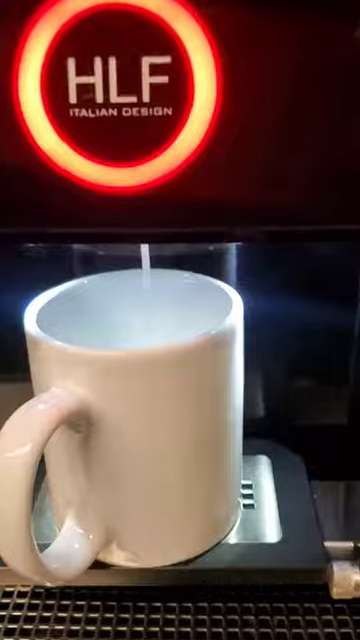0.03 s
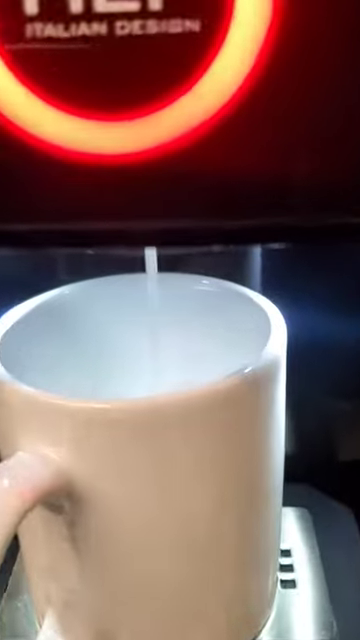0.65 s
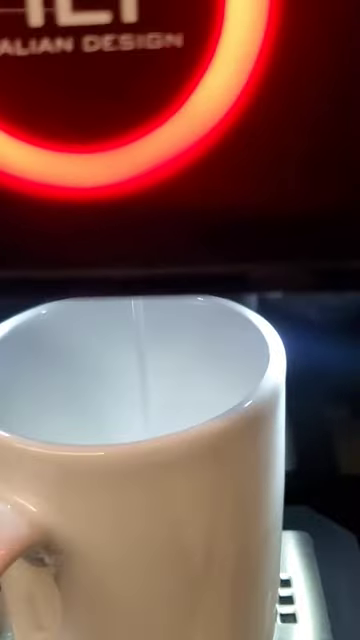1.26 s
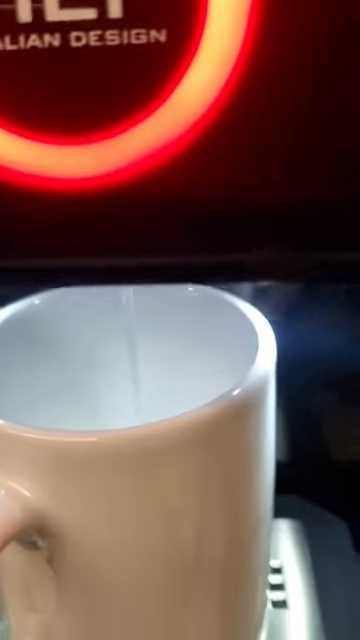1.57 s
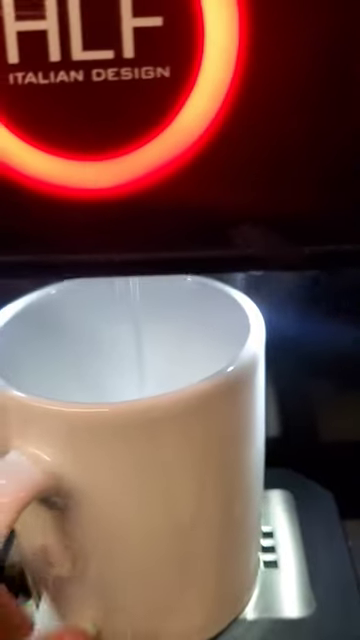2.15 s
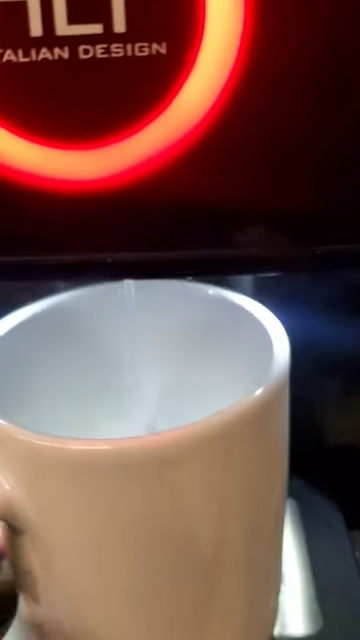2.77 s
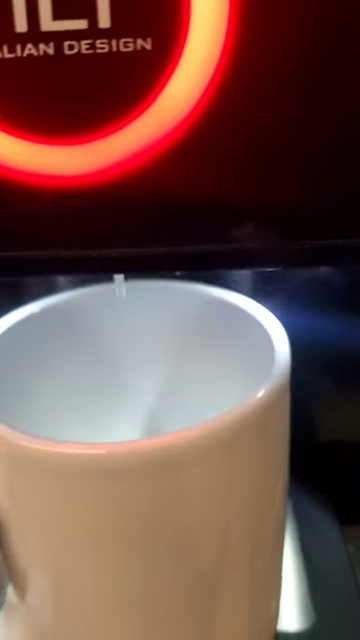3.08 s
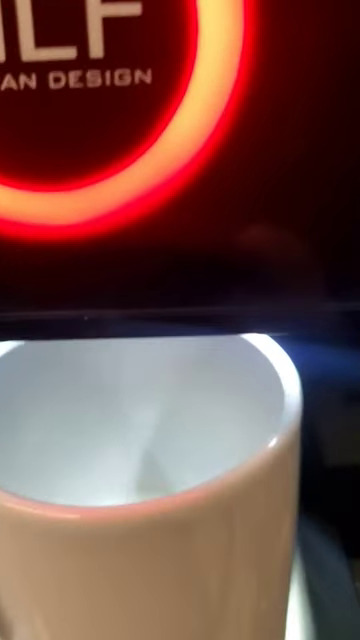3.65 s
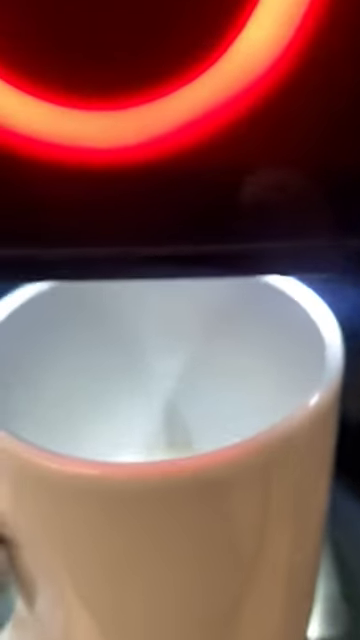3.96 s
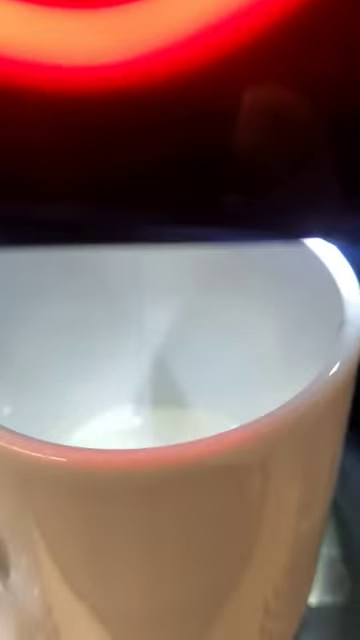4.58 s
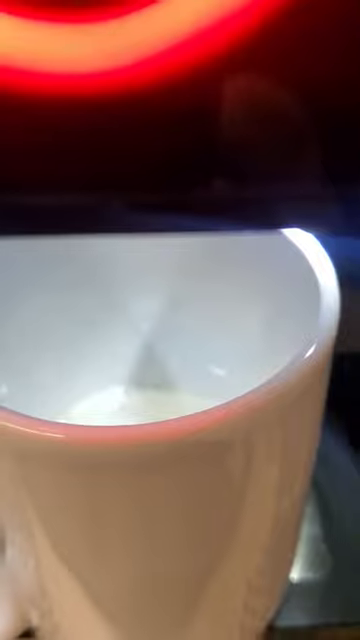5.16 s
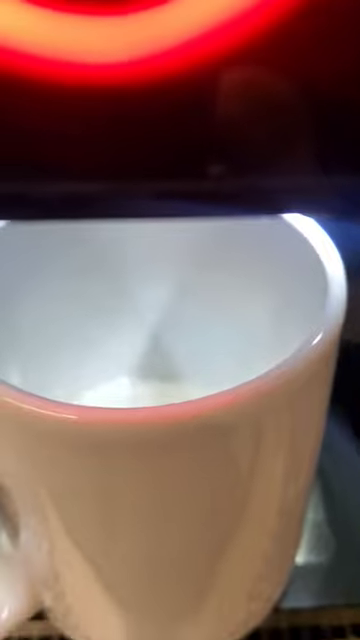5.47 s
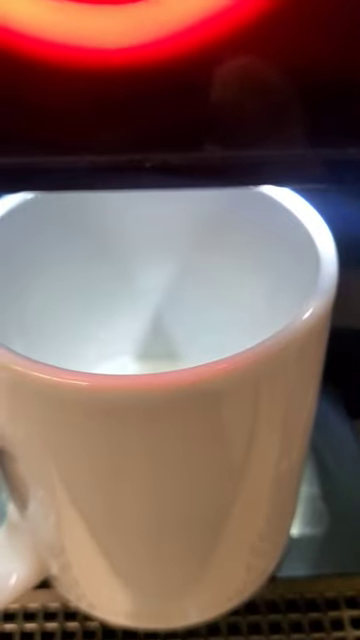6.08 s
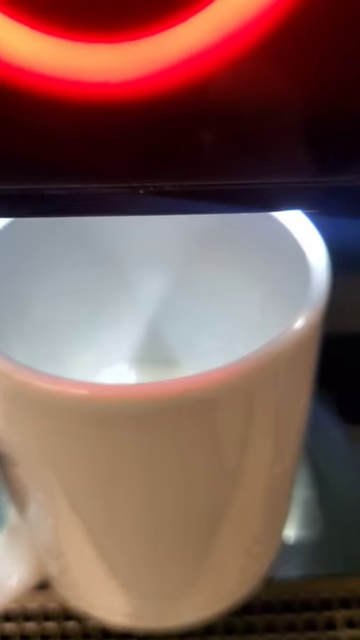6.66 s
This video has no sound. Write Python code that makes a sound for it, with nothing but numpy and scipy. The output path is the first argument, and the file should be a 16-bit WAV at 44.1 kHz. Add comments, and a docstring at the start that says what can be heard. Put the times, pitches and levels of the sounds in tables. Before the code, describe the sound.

A coffee machine fills a china mug, heard close in a quiet room with a steady fan underneath. From the start the pump gives a low hum with a slight whine, while a thin stream trickles into the mug. Irregular drops plip and splat, ringing briefly in the hollow of the mug, and foam makes small sharp ticks. A soft steam hiss swells at about 2 seconds and again near 3.6. At 4.2 seconds a valve gives one dry click and the pump stops. The last drops keep falling, softer, until about 5 seconds. At 5.1 seconds air drives the remaining water out of the spout in a noisy, gurgling spurt, with sharp spits and hollow plastic knocks, dying away by about 6 seconds. Until the end, near 7 seconds, the fan runs on with a faint hiss and a few ticks.

```python
"""A coffee machine pours a thin stream into a china mug, close by, in a quiet room with a fan running.
From the start the pump hums, drops trap bubbles that plip and ring the air in the mug, and foam ticks.
Steam swells twice in the spout; then a valve clicks and, at 4.2 s, the pump stops.
The last drops fall, and from 5.1 s air drives the water out of the spout, which spits and knocks.
At the end the fan runs on under a faint hiss and a few ticks."""
import sys
import numpy as np
from scipy import signal
from scipy.fft import rfft, irfft
from scipy.io import wavfile

SR = 44100
rng = np.random.default_rng(int(sys.argv[2]) if len(sys.argv) > 2 else 0)


def store_pcm(level_fs):
    """Save levels as 16-bit WAV."""
    pcm = np.round(np.clip(level_fs, -1, 1) * 32767).astype(np.int16)
    wavfile.write(sys.argv[1], SR, np.atleast_2d(pcm).T)


N = 300762
TIME, FREQ = np.arange(N) / SR, np.fft.rfftfreq(N, 1 / SR)
MAINS_HZ, SHAFT_HZ = 60, 28.82
START_S, PUMP_STOP_S = 0.086, 4.2
COVERED_S = 2.12  # from here on the rising liquid changes how the mug rings

# Strength of the stream. Each row: time in seconds, gain in dB.
STREAM_GAIN = [(0.1, -3.5), (1.0, 0), (1.7, 1.5), (2.2, -2.5), (2.8, -4), (3.4, -1.5), (4.15, -4),
               (4.35, -14), (4.55, -4.5), (5.1, -3)]
# Modes of the air in the mug. Each row: frequency in Hz, relative level in dB, T60 in seconds,
# change as the liquid rises in dB per second.
MUG_MODES = [(998, -0.5, 0.032, 2), (1332, 3.5, 0.039, -0.3), (1887, 0, 0.024, 2), (2630, -5.5, 0.026, 0),
             (2961, 3, 0.044, -3), (3320, -6, 0.025, -2.5), (4054, -1.5, .02, -2.5),
             (4764, -10.5, 0.038, -0.8), (5340, -12.5, 0.017, 2), (6100, -15.5, 0.029, 2.5)]
# Small bubbles, singing near those modes. Each row: pitch in Hz, bubbles per second, relative level in dB,
# change as the liquid rises in dB per second, left-right difference in dB.
BUBBLE_BANDS = [(950, 24, -36, -0.1, 2), (1280, 6.9, -41.5, 2.5, -4), (1864, 6, -46.5, 2, 9.5),
                (2962, 17, -40, -4.5, -0.5), (4200, 3, -54, -7, -9), (5850, 2, -51, -2, -10)]
# Spectrum of foam ticks and patter. Each row: frequency in Hz, gain in dB.
TICK_SPECTRUM = [(1500, -12), (3000, 0), (6000, 8), (8500, -1), (11000, 8), (16000, 0.5)]
STREAM_END_S, LOWEST_MODE_HZ = STREAM_GAIN[-1][0], MUG_MODES[0][0]


def amp(db):
    """Amplitude grows tenfold for every 20 dB."""
    return 10 ** (np.asarray(db) / 20)


def unit(x):
    """Normalisation to an rms of one."""
    return x / np.sqrt(np.mean(x ** 2) + 1e-20)


def read(points, hz):
    """Linear interpolation on a log-frequency axis."""
    f, value = np.transpose(points)
    return np.interp(np.log(hz + 1), np.log(f + 1), value)


def pan(db):
    """Interaural level difference, as left and right gains."""
    return amp(np.array([np.atleast_1d(db), -np.atleast_1d(db)]) / 2)


def add(mix, s, sound):
    """Superposition: a stereo sound joins the mix at s seconds."""
    part = mix[:, max(round(s * SR), 0):][:, :sound.shape[1]]
    part += sound[:, :part.shape[1]]


def wander(hz):
    """Low-pass noise: a random fluctuation of rms one."""
    return unit(irfft(rfft(rng.standard_normal(N)) * np.exp(-(FREQ / hz) ** 2), N))


def shape(x, spectrum):
    """Filtering: each frequency is multiplied by its gain."""
    return irfft(rfft(x) * amp(read(spectrum, FREQ)), N)


def colour(x, spectrum):
    """Spectral shaping to an rms of one."""
    return unit(shape(x, spectrum))


def envelope(start_s, hold_s, release_s, rise_s=0.0057):
    """Linear attack, hold and exponential decay."""
    t = TIME - start_s
    return np.clip(t / rise_s, 0, 1) * np.exp(-np.maximum(t - rise_s - hold_s, 0) / release_s)


def burst(t, rise_s, decay_s):
    """A transient builds up and decays exponentially."""
    return np.exp(-t / decay_s) * (1 - np.exp(-t / rise_s))


def tone(hz, waver_rad, left_lead_rad=0):
    """Random phase modulation makes a stereo sine of rms one waver."""
    phase = 2 * np.pi * np.cumsum(hz * np.ones(N)) / SR + waver_rad * wander(7.3)
    return np.sqrt(2) * np.sin(phase + rng.uniform(0, 2 * np.pi) + np.array([[left_lead_rad], [0]]))


def ring(modes, samples, uneven_db, rise_s):
    """Modal response to a blow: damped sines of uneven strength, with a different phase at each ear."""
    t = np.arange(samples) / SR
    hz, db, t60 = np.transpose(modes)[:, :, None]
    strength = amp(db + uneven_db * rng.standard_normal(hz.shape))
    phase = rng.uniform(0, 2 * np.pi, hz.shape) + rng.standard_normal((2, *hz.shape))
    waves = strength * np.exp(-np.log(1000) * t / t60) * np.sin(2 * np.pi * hz * t + phase)
    return waves.sum(axis=1) * (1 - np.exp(-t / rise_s))


def air():
    """Flow noise reaches the two ears with a correlation and balance that depend on frequency."""
    # Each row: frequency in Hz, interaural correlation before clipping.
    likeness = [(60, 0.2), (130, 1.14), (290, 0.63), (640, -0.54), (1410, -0.5), (3100, -0.32),
                (6820, -0.06), (15000, -1.8)]
    # Each row: frequency in Hz, left-right difference in dB.
    balance = [(60, 1), (110, 0.5), (200, 2), (380, -0.5), (700, 5), (1290, 1), (2380, 2), (4400, -7),
               (8120, -1.5), (15000, 22)]
    left, independent = rfft(rng.standard_normal((2, N)))
    correlation = np.clip(read(likeness, FREQ), -.99, .99)
    right = correlation * left + np.sqrt(1 - correlation ** 2) * independent
    return irfft(np.array([left, right]) * pan(read(balance, FREQ)), N)


def droplets(per_s, spread_db):
    """Shot noise: random impacts of uneven size, each with its own strength at each ear."""
    size = amp(spread_db * np.minimum(rng.exponential(1, N), 3)) * (rng.random(N) < per_s / SR)
    return unit(size * rng.standard_normal((2, N)))


def froth(per_s, spread_db, ring_s=0.002):
    """Tiny bubbles of many sizes resonate, each as a short ping."""
    out, t = np.zeros((2, N)), np.arange(SR // 100) / SR
    swell = t * np.exp(-t / ring_s)
    for when, pitch, size, side in rng.random((int(per_s * N / SR), 4)):
        ping = swell * np.sin(2 * np.pi * (1500 + 14000 * pitch ** 2) * t)
        gain = amp(spread_db * min(-np.log(1 - size), 3))
        add(out, when * N / SR, gain * np.outer([side, 1 - side], ping))
    return unit(out)


def echoes(x, t60s, delay_s):
    """Reverberation: dense random reflections, each band falling 60 dB in its own T60."""
    hz, t, bands = signal.stft(rng.standard_normal((2, SR // 2)), SR, nperseg=128)
    tail = signal.istft(bands * amp(-60 * t / read(t60s, hz)[:, None]), SR, nperseg=128)[1]
    tail = np.pad(tail, ((0, 0), (round(delay_s * SR), 0)))
    return signal.fftconvolve(x, tail / np.linalg.norm(tail[0]), axes=1)[:, :N]


def fan(air_db=-37.5, tones_gain_db=-1):
    """The cabinet's duct filters the cooling fan's steady flow noise; a few tones waver beside it."""
    # Each row: tone frequency in Hz, relative level in dB.
    tones = [(59.2, -51), (145.3, -48), (177.6, -51.5), (226.1, -49)]
    # Each row: frequency in Hz, relative level of the flow noise in dB.
    air_spectrum = [(12, -37), (20, -8.5), (65, -0.5), (116, -2), (134, -14), (182, -4), (357, -5.5),
                    (642, -12.5), (759, -9), (949, -6.5), (1060, -14.5), (1530, -19), (2020, -27.5),
                    (2910, -30), (16000, -63)]
    # Peaks and a dip of the duct. Each row: centre in Hz, width in Hz, gain in dB.
    duct = [(424, 200, -2.5), (629, 54, 8.5), (900, 560, 1.5)]
    duct_db = sum(db * np.exp(-((FREQ - hz) / width) ** 2) for hz, width, db in duct)
    rush = colour(irfft(rfft(air()) * amp(duct_db), N), air_spectrum)
    drone = sum(amp(db) * tone(hz, waver_rad=0.64) for hz, db in tones)
    return amp(air_db) * rush + amp(tones_gain_db) * drone


def pump(drive_db=-32.5, soft_start_db=-4, settle_s=0.35, coast_s=0.054, slowing_per_s=0.13, rush_db=-39):
    """Forced vibration: the motor hums at twice the mains, its shaft whines, water rushes; all die away."""
    # Mains harmonics. Each row: multiple, level in dB re the drive, left-right difference in dB.
    mains_lines = [(1, -42, 12), (8, -25, -10), (10, -32, -11), (12, -20, -7)]
    # Shaft tones. Each row: multiple of the shaft rate, level in dB re the drive, left-right in dB.
    shaft_lines = [(2.934, -21.5, -8), (8.01, -13.5, -1), (11.87, -23.5, -18), (12.91, -26.5, 25),
                   (13.81, -30.5, -25), (17.85, -22, -16), (24.2, -43, -36), (27.33, -30.5, 15),
                   (26.84, -29.5, -27)]
    # Rushing water. Each row: frequency in Hz, relative level in dB.
    rush_spectrum = [(30, 2), (80, -6), (170, -2.5), (280, 1), (370, -10), (450, -8), (620, -1), (850, 1),
                     (1200, -6.5), (1600, -21), (3000, -22.5), (8000, -48.5)]
    # The hum drifts to the left. Each row: time in seconds, left-right difference in dB.
    hum_side = [(0.1, 2), (1.2, 7.5), (4.2, 8)]
    stopped_s = np.maximum(TIME - PUMP_STOP_S, 0)
    speed = np.exp(-slowing_per_s * stopped_s)
    drive = amp(drive_db + soft_start_db * np.exp(-TIME / settle_s)) * np.exp(-stopped_s / coast_s)
    hum = amp(1.5) * tone(2 * MAINS_HZ * speed, waver_rad=0.074, left_lead_rad=1.03)
    hum *= pan(np.interp(TIME, *np.transpose(hum_side)))
    whine = sum(amp(db) * pan(side_db) * tone(multiple * hz * speed, waver_rad=0.2, left_lead_rad=-0.5)
                for hz, lines in ((MAINS_HZ, mains_lines), (SHAFT_HZ, shaft_lines))
                for multiple, db, side_db in lines)
    rush = colour(air(), rush_spectrum) * amp(rush_db + 0.74 * wander(17))
    return drive * (hum + whine) + rush * np.exp(-stopped_s / 0.089)


def valve(shut_s=4.1935, gain_db=-35):
    """The valve shuts just before the pump stops; its heavily damped modes give one dry click."""
    # Each row: frequency in Hz, relative level in dB, T60 in seconds.
    modes = [(2000, -21, 0.018), (3400, -10, .015), (5140, 6, 0.011), (5770, 1, 0.014), (6070, 7, 0.022),
             (6400, -1, 0.01)]
    out = np.zeros((2, N))
    click = ring(modes, samples=900, uneven_db=0, rise_s=.0004)
    add(out, shut_s, amp(gain_db) * pan(-3.5) * click)
    return out


def steam(gain_db=5, throb_depth=0.03, fade_s=0.06, drift_db=-1.4):
    """Wet steam hisses in the spout, amplitude-modulated by the pump; it swells twice, then lingers."""
    # Each row: frequency in Hz, relative level of the hiss in dB.
    spectrum = [(900, -26), (1800, -4.5), (2300, -2), (2900, -2), (3500, -6), (4600, -7.5), (6200, -5),
                (8500, -14.5), (11000, -6.5), (15500, -6.5)]
    # Each row: time of the crest in seconds, relative level in dB, rise and fall in seconds.
    crests = [(1.96, -49, 0.12, 0.23), (3.63, -50, 0.23, .26)]
    noise = rng.standard_normal((2, N)) + 0.53 * droplets(per_s=1300, spread_db=0.5)
    hiss = colour(noise + .5 * froth(per_s=600, spread_db=1), spectrum)
    ripple = np.sin(2 * np.pi * 3 * SHAFT_HZ * TIME) + np.sin(2 * np.pi * 2 * MAINS_HZ * TIME)
    throb = 1 + throb_depth * ripple * (TIME < PUMP_STOP_S)
    running = amp(-61.5 - 0.5 * TIME) * np.clip((PUMP_STOP_S - TIME) / fade_s + 1, 0, 1)
    lingering = amp(-68 - 3 * np.maximum(TIME - PUMP_STOP_S, 0))
    swells = [amp(db) * np.exp(-((TIME - s) / np.where(TIME < s, rise_s, fall_s)) ** 2)
              for s, db, rise_s, fall_s in crests]
    strength = np.linalg.norm([running, lingering, *swells], axis=0)  # powers add
    return amp(gain_db + drift_db * wander(6.3)) * strength * pan(-4.5) * hiss * throb


def knocks(gain_db=1):
    """Jolts of pressure excite the plastic spout's modes as the pump stops and slugs of water leave."""
    # Each row: start in seconds, relative level in dB.
    jolts = [(4.203, -42), (5.132, -33.5), (5.14, -36.5), (5.149, -33), (5.2, -36.5), (5.29, -42),
             (5.49, -39), (5.686, -36.5), (5.698, -38), (5.846, -45)]
    # Each row: frequency in Hz, relative level in dB, T60 in seconds.
    spout_modes = [(223, -9, 0.11), (273, -8, 0.23), (368, -7, 0.24), (539, 1, 0.13), (629, -2, 0.12),
                   (774, -1.5, 0.05), (809, 0, 0.078), (840, -2, 0.093), (1130, -28, .06), (1590, -5, .05),
                   (2120, -4, 0.02)]
    out = np.zeros((2, N))
    for s, db in jolts:
        add(out, s, amp(db + gain_db) * ring(spout_modes, samples=11000, uneven_db=-2, rise_s=0.0014))
    return out


def purge(start_s=5.128, blow_db=-41.5, sag_db_per_s=-20, flutter_db=2):
    """Two-phase flow: air at falling pressure drives out the last water in surges and sharp spits."""
    # Spectra of the low, middle and high layers. Each row: frequency in Hz, relative level in dB.
    gurgle_spectrum = [(110, -37), (180, -18), (227, 1), (407, -8), (464, -6), (705, -2.5), (822, -9),
                       (1170, -4.5), (1570, -11), (1700, -15), (2500, -20), (3250, -46), (5500, -120)]
    spray_spectrum = [(1000, -38), (1700, -8), (1900, -4), (2290, -7), (2490, 4), (2990, 3.5), (3660, -3),
                      (4740, 1), (7610, -13.5), (9000, -29), (11700, -50), (19800, -120)]
    fizz_spectrum = [(5000, -18.5), (8500, -7.5), (11000, 2.5), (16000, 1)]
    # Plugs of water give way. Each row: start in seconds, spray level in dB, decay in seconds,
    # relative gains of gurgle and fizz in dB.
    surges = [(5.127, -40, .028, 11.5, -17), (5.181, -38.5, 0.029, 4, -1), (5.468, -46, .04, 9, -5),
              (5.59, -42.5, 0.054, 3, -8.5), (5.667, -44, 0.037, 12, -11), (5.838, -54.5, 0.038, 17, -6)]
    # Slugs of water blown out. Each row: start in seconds, level in dB, decay in seconds,
    # centre in Hz, width in octaves.
    spits = [(5.129, -30, 0.011, 2870, 0.4), (5.297, -34, 0.01, 2930, 0.59),
             (5.475, -39, 0.016, 3500, 0.71), (5.367, -27, 0.0032, 5700, 0.14),
             (5.631, -31.5, 0.0085, 4320, 0.17), (5.672, -36.5, 0.0064, 5000, 0.43),
             (5.84, -32.5, 0.0065, 3120, 0.51), (6.021, -45, 0.0078, 3900, .3),
             (6.578, -42.5, 0.0087, 2940, 0.26)]
    pressure = amp(blow_db + sag_db_per_s * np.maximum(TIME - start_s, 0))
    blow = pressure * envelope(start_s, hold_s=0.37, release_s=0.11)
    pushes = [np.outer(amp([0, 5.5, -9.5]), blow)]  # spray, gurgle, fizz
    for s, db, decay_s, gurgle_db, fizz_db in surges:
        surge = amp(db) * envelope(s, hold_s=0, release_s=decay_s)
        pushes.append(np.outer(amp([0, gurgle_db, fizz_db]), surge))
    spray, gurgle, fizz = np.linalg.norm(pushes, axis=0)
    wet = rng.standard_normal((2, N)) + 0.66 * droplets(per_s=1000, spread_db=2)
    wet += 0.28 * froth(per_s=700, spread_db=8)
    out = amp(-1) * gurgle * colour(air(), gurgle_spectrum)
    out += spray * colour(wet, spray_spectrum) * pan(-3.5)
    out += fizz * colour(wet, fizz_spectrum) * pan(-2)
    t, hz = np.arange(SR // 4) / SR, np.fft.rfftfreq(SR // 4, 1 / SR)
    for s, db, decay_s, centre_hz, octaves in spits:
        band = np.exp(-.5 * (np.log2((hz + 1) / centre_hz) / octaves) ** 2)
        puff = unit(irfft(rfft(rng.standard_normal((2, len(t)))) * band, len(t)))
        add(out, s, amp(db) * puff * burst(t, rise_s=0.0024, decay_s=decay_s))
    return out * amp(flutter_db * wander(69))


def foam(gain_db=-2, spread_db=4, small_db_per_s=-1, count=60):
    """Each bursting cell radiates a broadband tick; small ones come at random and grow fainter."""
    # The largest cells, at the spout. Each row: start in seconds, relative level in dB.
    large = [(.4095, -41.5), (0.6018, -32), (0.7293, -43), (0.751, -45), (0.8654, -39), (.992, -43.5),
             (1.1044, -44), (2.3127, -41), (2.361, -37.5), (2.489, -42.5), (2.591, -43), (3.017, -40),
             (3.877, -38.5), (4.478, -51), (4.728, -41), (4.868, -51), (6.0187, -55), (6.1449, -54),
             (6.3081, -56), (6.575, -46.5)]
    out, t = np.zeros((2, N)), np.arange(SR // 40) / SR
    tick = pan(-0.5) * burst(t, rise_s=0.00046, decay_s=0.0055)
    small = [(s, -60 + small_db_per_s * s + spread_db * size)
             for s, size in zip(rng.uniform(START_S, N / SR, count), rng.standard_normal(count))]
    for s, db in large + small:
        add(out, s, amp(db + gain_db) * tick * rng.standard_normal((2, len(t))))
    return shape(out, TICK_SPECTRUM)


def flow():
    """The stream's strength as a gain, decaying exponentially after the last drop."""
    after_s = np.maximum(TIME - STREAM_END_S, 0)
    return amp(np.interp(TIME, *np.transpose(STREAM_GAIN))) * np.exp(-after_s / 0.014)


def mug(s, uneven_db=6):
    """Cavity resonance: the mug's air rings once; filling shifts its modes' levels, foam dulls them."""
    # Each row: time in seconds, tilt in dB per octave above the lowest mode.
    dulling = [(0.1, -3.5), (2.8, -1.5), (3.3, -2.5), (4.3, -1.5), (4.7, -1.5), (5.1, 0)]
    tilt = np.interp(s, *np.transpose(dulling))
    modes = [(hz, db + db_per_s * max(s - COVERED_S, 0) + tilt * np.log2(hz / LOWEST_MODE_HZ), t60)
             for hz, db, t60, db_per_s in MUG_MODES]
    return ring(modes, samples=1400, uneven_db=uneven_db, rise_s=0.0013)


def splash(ring_db=-53, spread_db=5.5, patter_db=-68, count=520):
    """Random impacts of small droplets excite the mug's air and patter on the china."""
    out = np.zeros((2, N))
    for s, size in zip(rng.uniform(START_S, STREAM_END_S, count), rng.standard_normal(count)):
        add(out, s, amp(ring_db + spread_db * min(size, 2)) * mug(s))
    patter = amp(patter_db) * colour(droplets(per_s=150, spread_db=8.5), TICK_SPECTRUM)
    return flow() * (out + patter)


def splats(ring_gain_db=3, snap_gain_db=-1):
    """Impulse excitation: a drop snaps hard on the surface and rings all the mug's modes at once."""
    # Each row: start in seconds, relative level in dB, left-right difference in dB.
    landings = [(0.3188, -34.5, -2), (0.5378, -43, -5), (1.0074, -34, 3), (1.1808, -45, -4),
                (1.6247, -42, 4), (1.707, -45, -8), (1.9652, -36, 0), (2.3137, -47.5, -4),
                (2.5136, -38.5, -2), (2.5984, -41.5, -1), (2.773, -41.5, -3), (3.064, -40.5, 0),
                (3.132, -46, -3), (3.626, -43, -6), (3.88, -38, 1), (3.918, -40, -2), (4.0692, -40.5, 1),
                (4.076, -41, -5), (4.524, -45, -1), (4.6452, -48, 4)]
    # Each row: frequency in Hz, gain in dB.
    snap_spectrum = [(700, -17), (1900, 2), (3000, 4), (4600, 3.5), (6500, -5.5), (8500, -15), (15000, -5)]
    rings, snaps, t = np.zeros((2, N)), np.zeros((2, N)), np.arange(SR // 40) / SR
    snap = burst(t, rise_s=0.00084, decay_s=0.0057)
    for s, db, side_db in landings:
        add(rings, s, amp(db + ring_gain_db) * pan(side_db) * mug(s, uneven_db=4.5))
        add(snaps, s, amp(db + snap_gain_db) * pan(side_db) * snap * rng.standard_normal((2, len(t))))
    return rings + shape(snaps, snap_spectrum)


def plip(db, hz, peak_s, side_db, glide_hz=70, left_lag_s=0.0001):
    """Bubble resonance: the tone swells, rings briefly and rises as the bubble nears the surface."""
    lag_s = np.array([[left_lag_s], [0]])
    age = np.maximum(np.arange(SR // 40) / SR - lag_s, 0) / peak_s  # one at the peak
    cycles = np.cumsum(hz + glide_hz * (np.minimum(age, 3) - 1), axis=1) / SR - hz * lag_s
    swell = (age * np.exp(1 - age)) ** 2
    return amp(db) * pan(side_db) * swell * np.sin(2 * np.pi * cycles)


def bubbles(spread_db=3, detune_hz=55, scatter_db=4, after_stop_db=-1.5, candidates=160):
    """Small bubbles resonate at random times, longer as the mug fills and softer once the pump stops."""
    out = np.zeros((2, N))
    span_s = STREAM_END_S - START_S
    for hz, per_s, db, db_per_s, side_db in BUBBLE_BANDS:
        chances, deviations = rng.random((candidates, 2)), rng.standard_normal((candidates, 3))
        for (when, luck), (size, pitch, side) in zip(chances, deviations):
            if luck < per_s * span_s / candidates:
                s = START_S + when * span_s
                level_db = db + db_per_s * max(s - COVERED_S, 0) + spread_db * min(size, 2)
                level_db += after_stop_db * (s > PUMP_STOP_S)
                peak_s = .0022 * (1 + .1 * s)
                add(out, s, plip(level_db, hz + detune_hz * pitch, peak_s, side_db + scatter_db * side))
    return flow() * out


def drops(slap_db=-46.5, slap_share=0.29, slap_db_per_octave=3, typical_db=-25, scatter_db=2):
    """Air entrainment: each large drop slaps the surface, ringing the mug, and traps a singing bubble."""
    # Each row: start in seconds, bubble level in dB, pitch in Hz, time to the peak in seconds.
    large_drops = [(.0905, -31.5, 970, .0018), (.1913, -39, 6000, 0.0013), (.2096, -30, 970, 0.0038),
                   (0.2429, -23.5, 1000, .0016), (.2874, -26.5, 965, 0.0021), (0.3181, -18.5, 2960, 0.0013),
                   (0.3346, -21.5, 1020, 0.0014), (0.385, -11, 1000, 0.0015), (.4345, -39.5, 6600, .0013),
                   (0.4823, -16, 894, .0021), (.495, -27, 860, .0026), (.571, -26, 940, 0.0018),
                   (0.5781, -17.5, 970, .0021), (0.6167, -19.5, 930, .0025), (0.643, -20.5, 1026, 0.0018),
                   (0.7364, -27, 1090, 0.0014), (0.775, -26.5, 950, 0.0018), (.889, -27.5, 810, 0.0026),
                   (.9252, -20, 875, 0.0033), (0.961, -14, 1020, .0016), (1.0087, -31, 2904, .0029),
                   (1.1053, -22, 2750, 0.0014), (1.139, -17, 1010, 0.0027), (1.2212, -29, 2905, 0.0026),
                   (1.4383, -11, 955, 0.0021), (1.5023, -23, 1110, 0.00096), (1.5755, -15.5, 950, .0031),
                   (1.616, -36, 2920, 0.0036), (1.7076, -25.5, 1065, 0.0024), (1.7258, -22, 960, 0.0016),
                   (1.744, -18.5, 1040, 0.0011), (1.8044, -30.5, 1060, 0.0017), (1.8259, -27, 950, 0.0021),
                   (1.9516, -31, 2830, 0.0018), (2.1095, -25, 1020, 0.0023), (2.1853, -30, 4090, 0.0012),
                   (2.2243, -23, 1040, 0.0013), (2.3632, -29, 2910, 0.0026), (2.3996, -22.5, 980, 0.0018),
                   (2.415, -20, 930, 0.0013), (2.4334, -21.5, 1005, 0.003), (2.6592, -28, 1030, 0.0028),
                   (2.7745, -22, 1180, 0.0009), (2.7867, -30.5, 2920, 0.0035), (2.7965, -24, 950, 0.0035),
                   (2.9409, -29, 960, .0045), (3.1147, -22, 940, 0.0046), (3.1307, -26.5, 955, 0.0036),
                   (3.1931, -14.5, 918, 0.0043), (3.2634, -31.5, 1840, 0.0042), (3.4342, -23, 970, 0.0045),
                   (3.452, -24.5, 950, 0.0027), (3.5387, -29, 1310, .0034), (3.5648, -28, 935, 0.0054),
                   (3.5861, -19, 950, 0.0033), (3.6954, -26, 960, 0.0039), (3.878, -35.5, 1900, 0.0027),
                   (3.893, -35, 4700, 0.0022), (4.0674, -29, 920, 0.0043), (4.078, -30, 1286, 0.0057),
                   (4.108, -25.5, 916, 0.003), (4.3722, -25.5, 955, .0045), (4.565, -32, 960, .0025),
                   (4.612, -38, 1820, 0.0019), (4.737, -30.5, 928, 0.0048), (4.844, -27.5, 940, 0.0051),
                   (4.9103, -36.5, 1880, .002), (4.9783, -37, 1830, 0.0032), (5.0297, -29, 945, 0.0042),
                   (5.049, -38, 1260, 0.0037)]
    out = np.zeros((2, N))
    side_by_pitch = [(hz, side_db) for hz, *_, side_db in BUBBLE_BANDS]
    for s, db, hz, peak_s in large_drops:
        side_db = read(side_by_pitch, hz) + scatter_db * rng.standard_normal()
        add(out, s, plip(db, hz, peak_s, side_db))
        hit_db = slap_db + slap_share * (db - typical_db)
        hit_db += slap_db_per_octave * np.log2(hz / LOWEST_MODE_HZ)
        add(out, s, amp(hit_db) * mug(s))
    return out


def scene(bay_db=-11, room_db=-18):
    """The sources superpose; the liquid sounds and knocks reverberate in the dispensing bay and room."""
    # Each row: frequency in Hz, the room's reverberation time in seconds.
    room_t60 = [(150, 0.37), (1000, 0.12), (4000, 0.4), (15000, 0.047)]
    direct = drops() + splats() + bubbles() + splash() + foam() + purge() + knocks()
    bay = echoes(direct, t60s=[(500, 0.066), (10000, 0.053)], delay_s=.003)
    room = echoes(direct, room_t60, delay_s=.012)
    return direct + amp(bay_db) * bay + amp(room_db) * room + steam() + pump() + valve() + fan()


def record(dry):
    """Gating and band limiting: the sound enters after a moment, and a low-pass trims the top treble."""
    fade_in = np.clip((TIME - START_S) / .004, .001, 1)
    low_pass = signal.firwin(255, cutoff=15900, window=("kaiser", 9), fs=SR)
    return signal.oaconvolve(dry * fade_in, low_pass[None], "same")


dry = scene()
out = record(dry)
store_pcm(out)
```